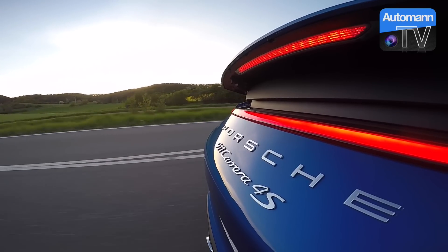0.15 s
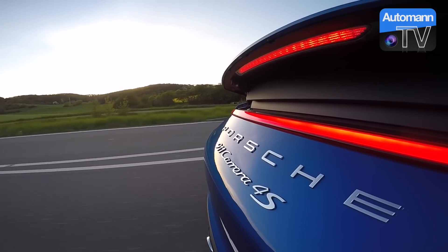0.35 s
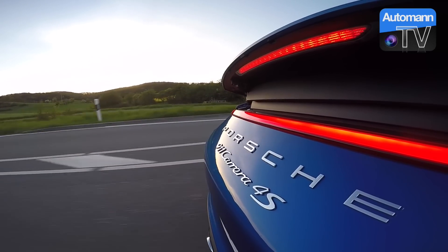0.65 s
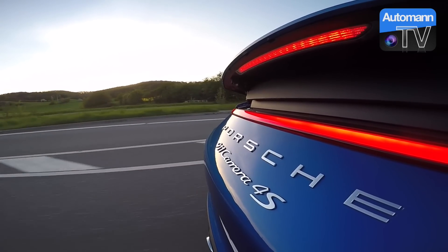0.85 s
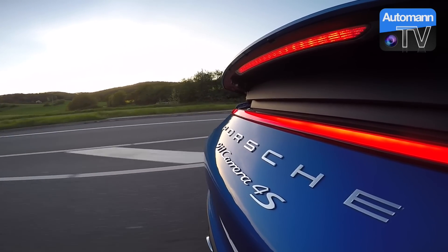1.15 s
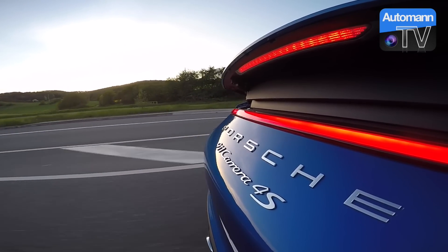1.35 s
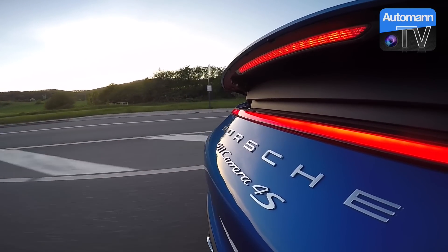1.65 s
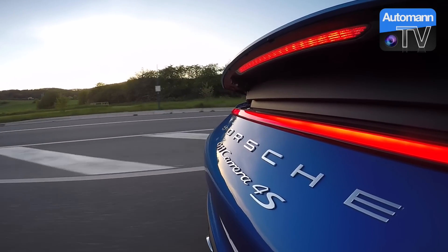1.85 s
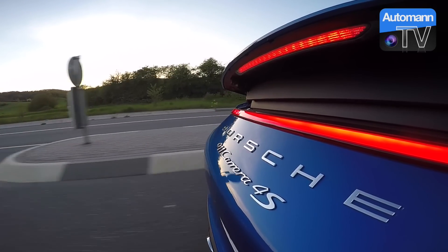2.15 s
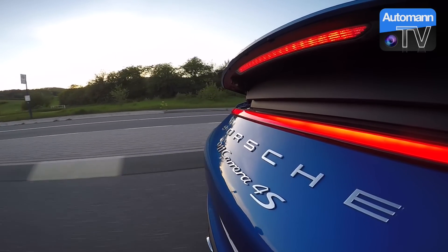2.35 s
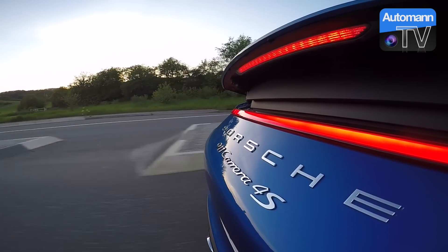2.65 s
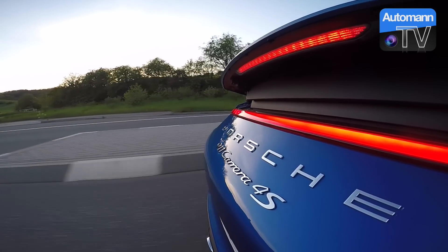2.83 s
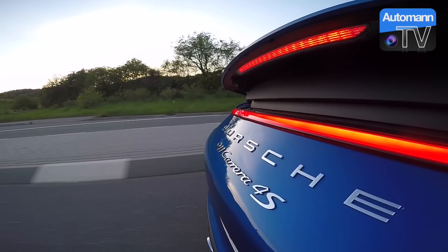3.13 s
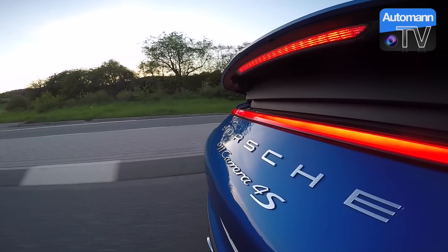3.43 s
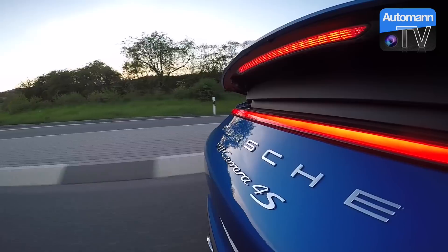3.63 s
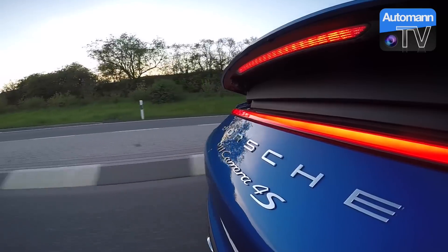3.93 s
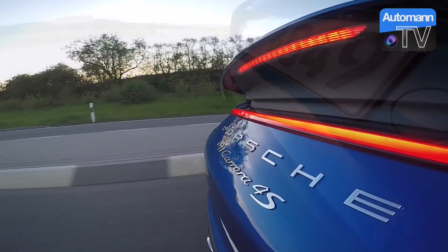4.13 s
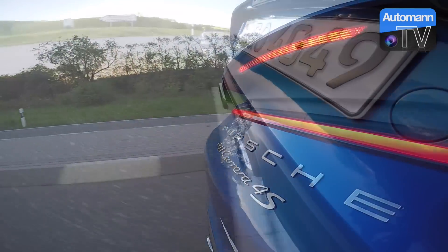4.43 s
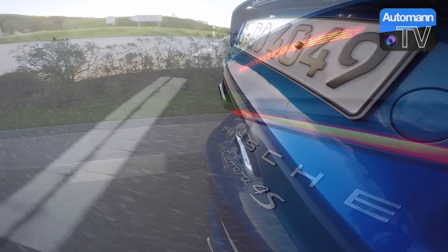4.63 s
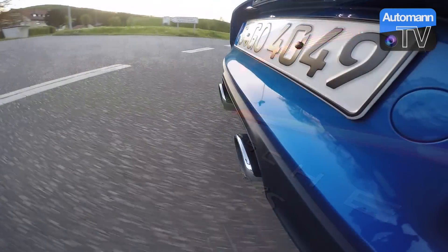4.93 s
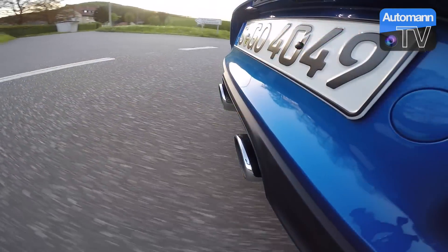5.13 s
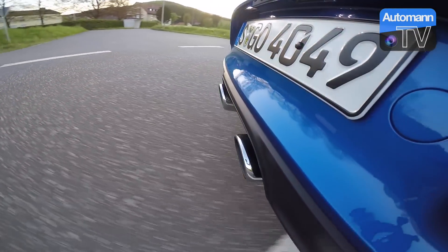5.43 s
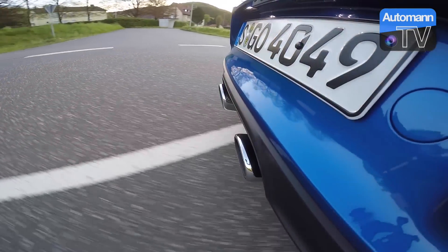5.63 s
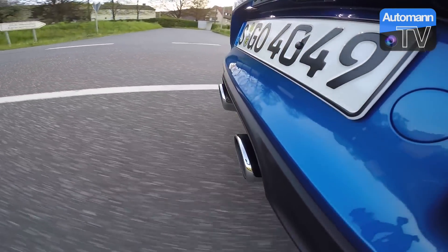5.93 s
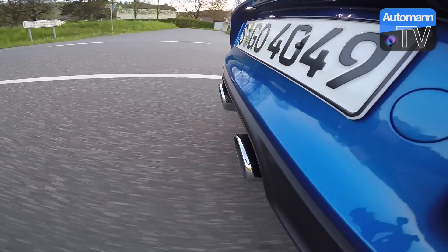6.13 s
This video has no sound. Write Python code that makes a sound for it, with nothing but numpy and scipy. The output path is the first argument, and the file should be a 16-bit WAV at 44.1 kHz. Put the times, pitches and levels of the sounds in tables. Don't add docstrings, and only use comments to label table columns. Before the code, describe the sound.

Close at a car's tail: throttle blip, a volley of booming exhaust pops, falling engine drone with road roar and faint whistle, then a throaty rising exhaust burble.

```python
import sys
import numpy as np
from scipy import signal
from scipy.io import wavfile
from scipy.ndimage import uniform_filter1d, map_coordinates

SR = 44100
rng = np.random.default_rng(int(sys.argv[2]) if len(sys.argv) > 2 else 0)


def undo_db(level):
    steps = np.asarray(level, float) / 20
    return 10 ** steps


def int16_out(signal):
    q = np.round(np.clip(np.atleast_2d(signal).T, -1, 1) * 32767)
    wavfile.write(sys.argv[1], SR, q.astype(np.int16))


N = 276948
T = np.arange(N) / SR

# pitch_hz, width_hz, level_db
PIPE = [(51.2, 14.2, -9), (115.3, 75, -3), (392, 38.6, 0), (438, 69, -9.5), (692, 53, -10.5),
        (1065, 116, -11.5), (2450, 300, -24), (5000, 900, -27)]
# pitch_hz, level_db (per Hz)
RUMBLE = [(12, -27.5), (25, -20), (40, 9.5), (60, 1), (85, -23), (130, -16.5)]
# start_s, gain_db
GAIN = [(0, -5), (.31, -1.5), (.43, -2), (.6, -4.5), (.9, -12), (1.25, -12), (2.05, -5), (2.8, 0.55),
        (4.2, 1.5), (4.36, -2), (4.52, -5), (4.58, -10), (4.85, -11.5)]
SCRUB_S = (3.4, 5.44, 4.3)


def evened(x):
    return x / np.sqrt(np.mean(x ** 2) + 1e-20)


def read(points, hz):
    f, value = np.transpose(points)
    return np.interp(np.log(hz + 1), np.log(f + 1), value, value[0] - 40, value[-1] - 40)


def play(rows):
    s, *columns = np.transpose(rows)
    return [np.interp(T, s, c) for c in columns]


def stage(times):
    return np.interp(T, times, [0, 1, 1, 0])


def drift(rate):
    knots = rng.standard_normal(int(N / SR * 200) + 2)[:int(N / SR * rate) + 2]
    return evened(map_coordinates(knots, [T * rate], order=2))


def resonate(x, hz, width):
    turn = np.exp(2j * np.pi * np.cumsum(hz * np.ones(len(x))) / SR)
    r = np.exp(-np.pi * width / SR)
    return 2 * (turn * signal.lfilter([1 - r], [1, -r], x / turn)).real


def twice(x, hz, width):
    return resonate(resonate(x, hz, width), hz, width)


def noise(spectrum, patchy_db, flicker_db, size=512):
    frames, hz = 4 * N // size + 5, np.fft.rfftfreq(size, 1 / SR)
    a, b, patches = rng.standard_normal((frames, len(hz), 3)).T
    patches = uniform_filter1d(patches, size=5, axis=0)
    patches = evened(uniform_filter1d(patches, size=12, axis=1))
    flicker = evened(uniform_filter1d(rng.standard_normal(frames), size=3))
    level_db = read(spectrum, hz)[:, None] + patchy_db * patches + flicker_db * flicker
    z = (a + 1j * b) * undo_db(level_db)
    return evened(signal.istft(z, nperseg=size, noverlap=3 * size // 4)[1][:N])


def firings(turns, spread_db):
    hit = np.diff(np.floor(turns), prepend=0) > 0
    return hit * undo_db(spread_db * rng.standard_normal(N))


def ring(clicks, modes):
    return sum(undo_db(db) * twice(clicks, hz, width) / width for hz, width, db in modes)


def coasting():
    # start_s, rate_hz (engine cycles)
    speed = [(0, 27.8), (.16, 27.8), (.2, 28.9), (.27, 33.9), (.33, 38.4), (.37, 39.5), (.61, 38.8),
             (.74, 38), (.96, 37.3), (1.1, 36.1), (1.34, 36), (1.82, 34.2), (2.36, 32), (2.72, 30.3),
             (3.23, 27.2), (3.77, 23.8), (4.6, 18.3)]
    # multiple, level_db
    uneven = [(1, 1.5), (2, 0), (3, -4.5), (4, -16), (5, -26.5), (6, -2.5), (7, -40.5), (8, -10.5), (9, -8),
              (10, -20.5), (11, -11), (12, -13.5), (13, -11), (14, -20.5), (15, -24), (16, -12),
              (17, -18.5), (18, -14.5), (19, -12), (20, -22), (21, -10), (22, -15.5), (24, -14)]
    # pitch_hz, level_db
    silencer = [(16, -6.5), (55, 1), (150, 1.5), (215, -4), (420, 5.5), (580, -13.5), (730, -5),
                (1000, -45)]
    # multiple (of the cycle), level_db
    gears = [(78, -47), (84, -39), (126, -39), (168, -41)]
    blip_s = .13, .21, .325, .355
    lope_s = .33, .36, .62, .8
    # starts_s, full_s, starts_to_fall_s, end_s, rasp_db
    rasp_swells = [
        (4.17, 4.25, 4.37, 4.42, 14),
        (4.5, 4.54, 4.71, 4.76, 20),
    ]
    rate, gain_db, blip, lope = play(speed)[0], play(GAIN)[0], stage(blip_s), stage(lope_s)
    scrub = np.interp(T, SCRUB_S, [0, 1, .5])

    turns, tone, power = np.cumsum(rate) / SR + .3, 0, 0
    for k in range(1, 25):
        open_db = 7.5 * (k % 6 == 0) - 17 * (k < 6) + 6 * (k > 8)
        lope_db = -10 * (1 < k < 6) - 6 * (6 < k < 10)
        state_db = blip * open_db + lope * lope_db
        size = undo_db(np.interp(k, *np.transpose(uneven)) + read(silencer, k * rate) + state_db)
        power = power + size ** 2 / 2
        lag = np.angle(sum(undo_db(db) / (w / 2 + 1j * (k * rate - hz)) for hz, w, db in PIPE[:5]))
        waver = undo_db(1.2 * drift(6) + .4j * drift(12))
        scatter = 3.84 * rng.random() * (k > 3) * (0.36 + 0.66 * (T > .66))
        tone = tone + size * (waver * np.exp(1j * (2 * np.pi * k * turns + lag + scatter))).real
    tone = tone / np.sqrt(power) * np.clip((4.62 - T) / 0.034, 0, 1)

    clicks = firings(6 * turns + .1 * drift(90), spread_db=3)
    rasp = evened(ring(clicks, PIPE[2:6] + [(2450, 600, -2)])) * np.clip((4.78 - T) / .04, 0, 1)

    case_hz, case_width_hz = (1880, 2300, 3000, 4200, 5050), 170
    teeth = 0
    for k, db in gears:
        level = undo_db(db + 2.5 * drift(5.))
        case = sum(1 / (1 + ((k * rate - hz) / case_width_hz) ** 2) for hz in case_hz)
        teeth = teeth + level * case * np.sin(2 * np.pi * k * turns)
    teeth = teeth * stage([1.6, 3.1, 4.1, 4.25])

    tone_db = -14.5 + 0.51 * gain_db + 0.5 * blip + 3 * lope + scrub
    swell_db = sum(row[4] * stage(row[:4]) for row in rasp_swells)
    rasp_db = -35 + .7 * gain_db + 16 * blip - 8 * lope + swell_db
    return undo_db(tone_db) * tone + undo_db(rasp_db) * rasp + teeth


def thuds():
    # start_s, level_db, pitch_hz, length_s
    changes = [
        (0, -6.5, 30, 0.069),
        (0.139, -3, 59, 0.082),
        (4.5, -5, 57, .075),
    ]
    out = 0
    for s, db, hz, length_s in changes:
        swell = np.sin(np.pi * np.clip((T - s) / length_s, 0, 1)) ** 0.66
        out = out + undo_db(db) * swell * np.sin(2 * np.pi * hz * (T - s) + 1.2)
    return out


def road():
    # pitch_hz, level_db (per Hz)
    hiss_spectrum = [(290, 0.5), (500, -9.5), (612, -31.5), (722, -3), (842, -13), (1080, -6.5),
                     (1490, -13), (1860, -11.5), (2070, -14), (2960, -12), (3490, -18.5), (4170, -20),
                     (6470, -22), (7920, -33.5), (8500, -56), (11000, -52), (18700, -120)]
    # pitch_hz, level_db (per Hz)
    fizz_spectrum = [(6500, -25), (7500, -1.5), (10000, 7.5), (13000, -8), (16000, -21)]
    # pitch_hz, level_db (per Hz)
    roar_spectrum = [(70, -27), (110, -12), (200, 6), (300, 2.5), (420, 2.5), (500, -1), (600, -10),
                     (800, -16)]
    # pitch_hz, width_hz, level_db
    hollows = [(719, 25, 3), (1080, 30, -8), (2390, 80, -10), (4135, 150, -3.5), (5045, 230, -2)]
    gain_db = play(GAIN)[0]
    scrub = np.interp(T, SCRUB_S, [0, 1, .5])
    rougher = np.clip((.85 - T) / 0.13, 0, 1)
    roar_db = -22 + gain_db + 10.5 * scrub
    rumble_db = -15 + 0.64 * gain_db + 5.5 * scrub + 1.5 * rougher
    fizz_db = -55.5 + .5 * gain_db
    gone = np.clip((4.85 - T) / 0.12, 0, 1)
    shut = np.interp(T, [4.1, 4.5, 4.58], [1, .7, .15])

    hiss = noise(hiss_spectrum, patchy_db=1.2, flicker_db=.6)
    hiss = hiss + sum(undo_db(db) * resonate(hiss, hz, width) for hz, width, db in hollows)
    fizz = noise(fizz_spectrum, patchy_db=1, flicker_db=.6)
    roar = noise(roar_spectrum, patchy_db=.8, flicker_db=1, size=1024)
    rumble = noise(RUMBLE, patchy_db=1.5, flicker_db=1.5, size=4096)
    air = undo_db(gain_db) * (undo_db(-27.5) * hiss + undo_db(fizz_db) * shut * fizz)
    return gone * (air + undo_db(roar_db) * roar + undo_db(rumble_db) * rumble)


def turbo():
    # start_s, pitch_hz
    spools = [
        [(.13, 8000), (.21, 8700), (.25, 9800), (.335, 13000)],
        [(1.3, 6300), (1.5, 8800), (1.7, 10100), (1.9, 10600), (2.15, 10780), (2.45, 10630), (3, 9750),
         (3.5, 9050), (4.5, 7750)],
        [(4.55, 7300), (4.64, 8100), (4.73, 8900)],
    ]
    # pitch_hz, level_db (per Hz)
    sigh_spectrum = [(2000, -12), (4000, 0), (7000, -5), (9000, -12), (14000, -14), (16000, -16)]
    whistle = 0
    for rows, db in zip(spools, (-55, -56, -54)):
        hz = uniform_filter1d(play(rows)[0], size=2000)
        on = np.clip(np.minimum(T - rows[0][0], rows[-1][0] - T) / 0.023, 0, 1)
        whistle = whistle + undo_db(db) * on * evened(twice(rng.standard_normal(N), hz, 280))
    puff = np.interp(T, [4.43, 4.51, 4.57], [0, 1, 0]) ** 2
    sigh = puff * noise(sigh_spectrum, patchy_db=1, flicker_db=1)
    return undo_db(.55 * play(GAIN)[0]) * whistle + undo_db(-36) * sigh


def pops():
    # start_s, peak_db, boom_db, crack_db, pitch_factor
    bursts = [(0.14, -5.5, 3, -26, 1.02), (0.212, -19, 15, -21, 1.23), (0.611, -16, 5.5, -22.5, 1.16),
              (0.67, 12, 9, -30.5, 1.1), (0.683, -3.5, -10.5, -33, 0.98), (0.701, -2.5, 6, -26.5, 1.04),
              (0.737, 4, 5.5, -26.5, 1.11), (0.778, 26, 9.5, -29.5, 0.98), (0.827, -1, 3, -30, 1.01),
              (0.845, -7.5, 6, -21, 1.08), (0.912, 1, 6, -28.5, 1.01), (0.986, 6, 4, -26, 0.976),
              (1.002, -7, 6, -65, 0.9), (1.018, -5, -15.5, -31, 1.01), (1.029, -8, 1, -35, 0.91),
              (1.067, -3.5, 4, -28, 1.01), (1.153, -1, 5, -30, 0.98)]
    out, t = np.zeros(N), np.arange(4000) / SR

    def struck(modes, tune):
        return sum(undo_db(d) * np.exp(-np.pi * w * t) * np.sin(2 * np.pi * f * tune * t + 2.2 * (f < 80))
                   for f, w, d in modes)

    for (s, db, boom_db, crack_db, tune), seed in zip(bursts, rng.standard_normal((len(bursts), 4000))):
        boom, body = struck(PIPE[:2], tune), struck(PIPE[2:6], tune)
        kick = (undo_db(min(boom_db, 6)) * boom - body) * (1 - np.exp(-t / .0008))
        shell = (twice(seed, 1500, 1500) + 1.3 * resonate(seed, 2500 * tune, 450)) * np.exp(-t / .007)
        snap = twice(seed, 4600 / tune ** 2, 3200) * np.exp(-t / .002)
        crack = undo_db(crack_db + 11) * (1.3 * shell + .8 * snap)
        part = out[round(s * SR):][:4000]
        part += undo_db(min(db + 3, 2)) * (kick + crack)
    return signal.lfilter(*signal.butter(2, 7000, fs=SR), out)


def pulling():
    # start_s, rate_hz (firings of one bank)
    bank_rate = [(4.4, 33.0), (4.508, 33.7), (4.582, 33.2), (4.676, 33.3), (4.88, 34.6), (5.08, 36.2),
                 (5.43, 38.0), (6.106, 45.5), (6.28, 47.2)]
    # pitch_hz, level_db
    tailpipe = [(30, -25.5), (70, 5.5), (128, -5), (170, -2.5), (215, -16.5), (260, -12.5), (330, -7.5),
                (420, -14.5), (520, -38.5), (700, -48)]
    # pitch_hz, level_db (against the near bank)
    far_bank = [(40, -1.5), (150, 4), (300, 2.5), (450, -11), (700, 6)]
    # pitch_hz, width_hz, level_db
    modes = [(356, 60, 9), (638, 52, -3.5), (956, 78, -4.5), (1802, 130, -7), (2584, 73, -15)]
    # pitch_hz, level_db (per Hz)
    gas_spectrum = [(440, -1.5), (620, -0.5), (780, -20), (960, -8.5), (1300, -17.5), (1850, -14.5),
                    (2450, -11), (3500, -20.5), (4200, -20), (5400, -20), (5950, -30.5), (7000, -25.5),
                    (8000, -43), (11500, -50), (13200, -37)]
    far_lag_s = 0.00097
    loud_firing_s = 6.165
    slow_hz, slow_rad_per_hz = 88, -.024
    near_db, far_db = (3.5, -3.5, -1), (-2, -1, 5)
    rate = play(bank_rate)[0]
    octaves = np.log2(rate / 36)
    pipe_db, gas_db, bright_db = -12 + 6 * octaves, -39.5 + 14 * octaves, -19 + 21.5 * octaves

    turns, tone = np.cumsum(rate * (1 + .008 * drift(40))) / SR, 0
    turns = turns - turns[round(loud_firing_s * SR)] + 300
    throb = 1 + .2 * np.cos(2 * np.pi * turns / 3)
    for k in range(1, 16):
        hz = k * rate
        banks = 1 + (-1) ** k * undo_db(read(far_bank, hz)) * np.exp(-2j * np.pi * hz * far_lag_s)
        lean = np.exp(1j * (slow_rad_per_hz * np.maximum(slow_hz - hz, 0) - .05 - 1.6 * (hz / 500) ** 2))
        upper_db = (bright_db + 14.5) * min(max(k - 3, 0) / 6, 1)
        level = undo_db(read(tailpipe, hz) + upper_db + (1.0 + 0.12 * k) * drift(11)) * throb ** (k > 6)
        tone = tone + level * (banks * lean * np.exp(2j * np.pi * k * turns)).real
    tone = tone / 2 * undo_db(.6 * drift(45))

    turns = turns + .016 * drift(70)
    one, other = firings(turns, spread_db=2), firings(turns + .5, spread_db=1.5)
    one = one * undo_db(np.take(near_db, (turns % 3).astype(int)))
    other = other * undo_db(np.take(far_db, ((turns + .5) % 3).astype(int)))
    near = one + .55 * other
    far = .4 * one + 1.6 * other
    chime = evened(ring(near, modes[:2] + modes[3:]) + ring(far, modes[2:3]))

    puffs = signal.lfilter([1], [1, -np.exp(-1 / (.004 * SR))], near)
    gas = evened(noise(gas_spectrum, patchy_db=1.5, flicker_db=.6) * (.6 + puffs))
    gas = gas * np.clip((T - 4.55) / 0.44, 0, 1)
    lumps = noise(RUMBLE, patchy_db=2.5, flicker_db=2.5, size=4096)
    return undo_db(pipe_db) * (tone + undo_db(-21.5) * chime + undo_db(-18.5) * lumps) + undo_db(gas_db) * gas


def scene():
    fade_start_s, fade_end_s = 4.36, 4.97
    fade = np.clip((T - fade_start_s) / (fade_end_s - fade_start_s), 0, 1)
    first = coasting() + pops() + thuds() + road() + turbo()
    return (first + pulling() * np.sin(np.pi / 2 * fade) ** 1.06)[None]


def roll_off(x):
    return signal.sosfilt(signal.butter(12, 15530, fs=SR, output="sos"), x)


def record(dry):
    held = dry / (1 + abs(dry) ** 8) ** (1 / 8)
    low_pass = signal.firwin(511, 15530, window=("kaiser", 9), fs=SR)
    held = signal.oaconvolve(held, low_pass[None], "same")
    return roll_off(held)


dry = scene()
out = record(dry)
int16_out(out)
```